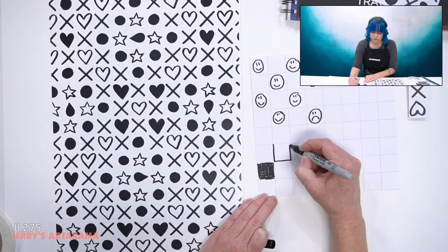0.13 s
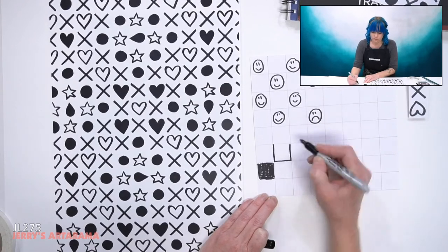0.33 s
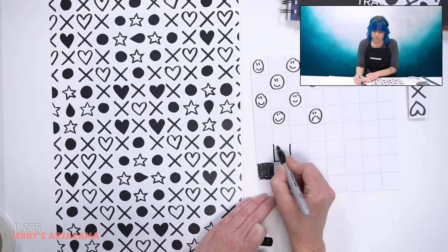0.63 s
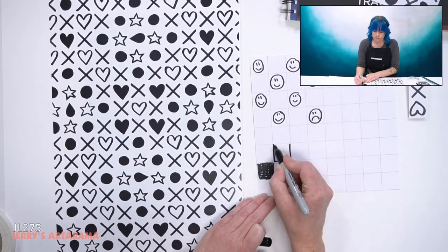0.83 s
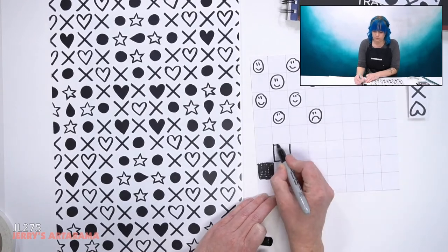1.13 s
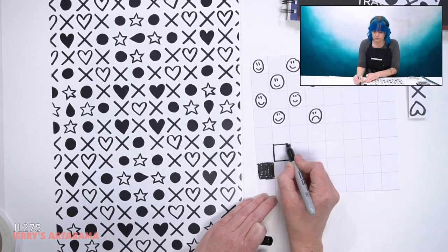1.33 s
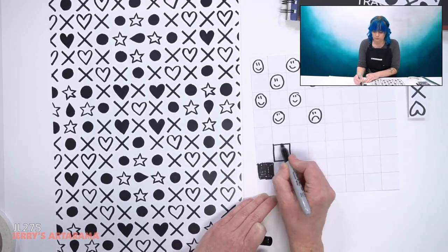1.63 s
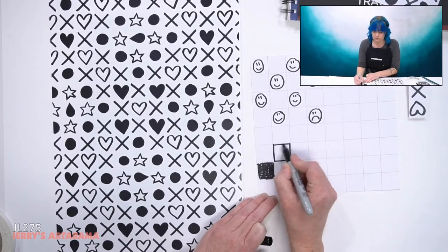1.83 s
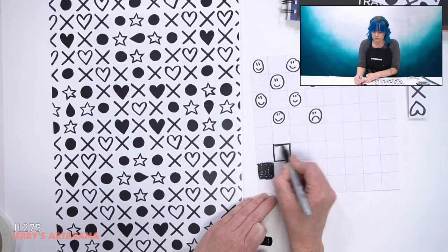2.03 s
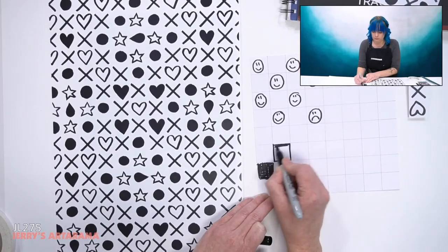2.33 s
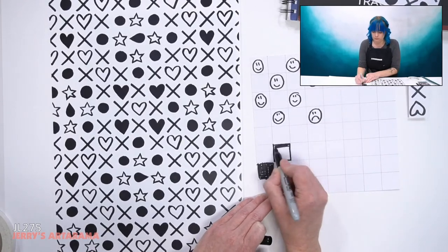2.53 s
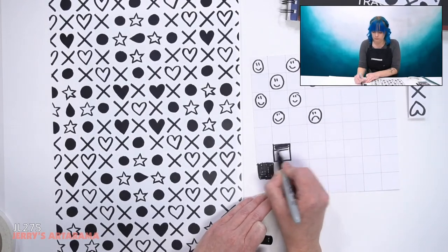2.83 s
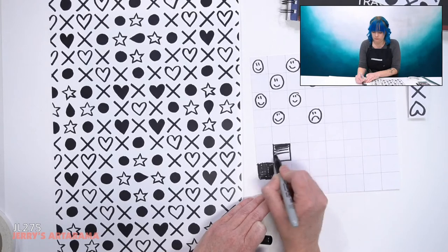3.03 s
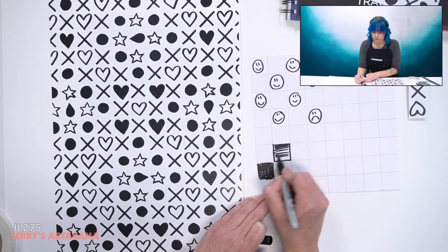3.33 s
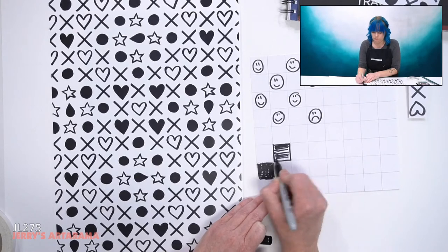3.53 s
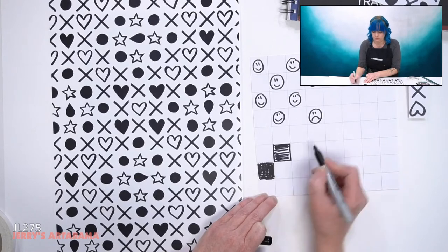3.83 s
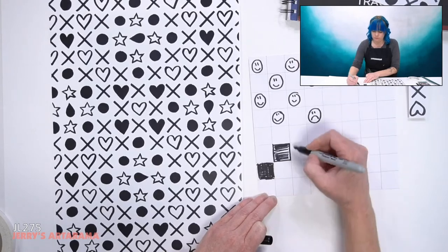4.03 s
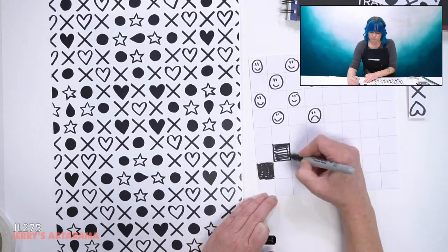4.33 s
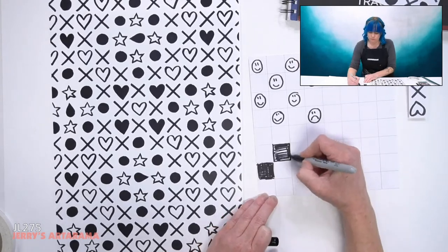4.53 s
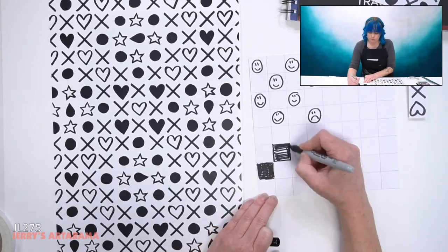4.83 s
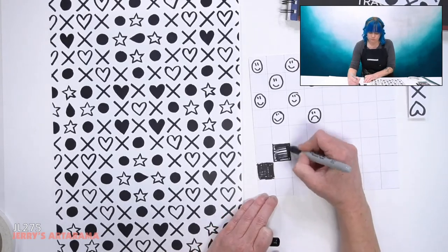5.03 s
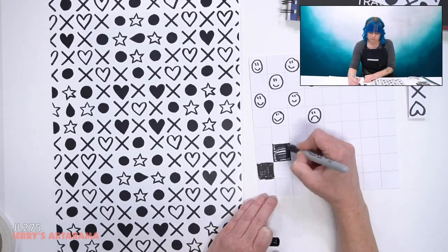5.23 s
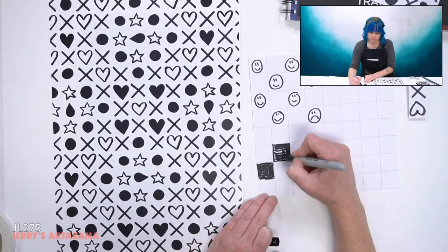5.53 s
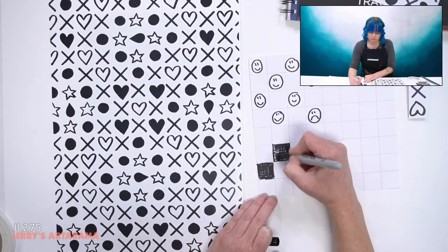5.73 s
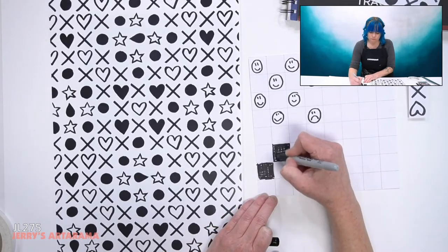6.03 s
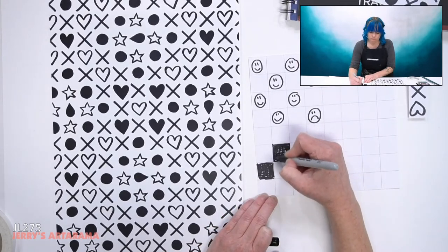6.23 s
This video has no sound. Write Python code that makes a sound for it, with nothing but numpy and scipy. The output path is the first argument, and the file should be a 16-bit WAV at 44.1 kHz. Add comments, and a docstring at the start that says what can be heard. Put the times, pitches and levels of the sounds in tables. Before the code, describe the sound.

A felt-tip marker squeaks out a few slow lines on paper, then scribbles rapid, even hissing strokes in two bouts in a quiet room.

```python
"""A felt-tip marker draws the sides of a small square on paper, then fills it with hissing strokes:
quick up-and-down ones, then, after a change of grip, harder side-to-side ones.
Shaped noise follows the nib's speed and pressure; slow lines stick and slip, and pen and table resonate.
The hand rubs over the sheet, nib and paper touch and bump, and a quiet room hums behind."""
import sys
import numpy as np
from scipy import signal
from scipy.fft import rfft, irfft
from scipy.io import wavfile
from scipy.ndimage import map_coordinates

SR = 44100
rng = np.random.default_rng(int(sys.argv[2]) if len(sys.argv) > 2 else 0)


def put_to_file(sound):
    """Save the sound as 16-bit audio at rate SR, in the file named by the first command-line argument."""
    columns = np.atleast_2d(sound).T  # one column per channel
    safe = np.clip(columns, -1, 1)
    whole_steps = np.round(safe * 32767)
    wavfile.write(sys.argv[1], SR, whole_steps.astype(np.int16))


N = 281269
EDGE_HZ = 15750  # top of the audible band
JUDDER_GAP_S, JUDDER_END_S = 0.0157, 0.14  # first gap between jumps, end of the judder

# Spectrum of felt sticking and slipping. Each row: frequency in Hz, relative density in dB per Hz.
CHATTER_SPECTRUM = [(400, -16), (750, -7.5), (1100, 1), (1330, 3), (1600, -0.5), (2000, -18.5),
                    (2550, -8.5), (3600, -20.5), (8000, -49)]
# Spectrum of the hand rubbing on paper. Each row: frequency in Hz, relative density in dB per Hz.
RUB_SPECTRUM = [(500, -10.5), (1500, -19.5), (2150, -14.5), (2650, -1), (3150, -2), (3650, -3.5),
                (4300, -4.5), (7000, -16), (14000, -43)]


def amp(db):
    """Amplitude factor of a level in dB."""
    return 10 ** (np.asarray(db) / 20)


def unit(x):
    """Scales to rms 1."""
    return x / np.sqrt(np.mean(x ** 2) + 1e-20)


def spectrum(points, hz):
    """Gain at hz, interpolated over log frequency along (Hz, dB) points."""
    point_hz, db = np.transpose(points)
    return amp(np.interp(np.log(hz + 1), np.log(point_hz), db))


def add(mix, start_s, sound):
    """Mixes a sound in from a start time."""
    part = mix[max(round(start_s * SR), 0):][:len(sound)]
    part += sound[:len(part)]


def colour(x, points, echoes=(), path=1):
    """Shapes noise by a spectrum and by close echoes, whose delays scale with path; rms 1."""
    hz = np.fft.rfftfreq(len(x), 1 / SR)
    khz = hz / 1000
    comb = 1 + sum(share * np.exp(-2j * np.pi * khz * ms * path) for ms, share in echoes)
    return unit(irfft(rfft(x) * spectrum(points, hz) * comb, len(x)))


def ring(x, hz, width_hz):
    """A steep resonance, the same peak filter applied twice; rms 1."""
    b, a = signal.iirpeak(hz, hz / width_hz, SR)
    once = signal.lfilter(b, a, x)
    return unit(signal.lfilter(b, a, once))


def fibres(size, grain_db, patch_db, patch_hz=300):
    """Countless tiny snags of uneven strength, bunched by the tooth of the paper; rms 1."""
    snag, strength, tooth = rng.standard_normal((3, size))
    lowpass = signal.butter(2, patch_hz, fs=SR, output="sos")
    tooth = unit(signal.sosfilt(lowpass, tooth))
    snags = unit(snag * amp(grain_db * strength))
    soft_snags = np.tanh(snags / 4.7)  # the soft felt gives way before a snag exceeds 4.7 times the rms
    return unit(soft_snags * amp(patch_db * tooth))


def burst(level_db, decay_s, points):
    """A short scuff of coloured noise that starts quickly and dies away."""
    u = np.arange(0, 4, 1 / (decay_s * SR))  # time in decay lengths
    envelope = (1 - np.exp(-u / 0.12)) / (1 + u ** 6)
    return amp(level_db) * envelope * colour(rng.standard_normal(len(u)), points)


def room_tone(noise_db=-59):
    """Low ventilation noise with a few faint steady tones."""
    # Spectrum of the noise. Each row: frequency in Hz, relative density in dB per Hz.
    noise_spectrum = [(20, -9.5), (32, -14), (44, 1), (62, -3.5), (90, -1.5), (140, 2), (220, -0.5),
                      (400, -3.5), (600, -10), (1100, -15.5), (2000, -19), (5000, -23.5), (10500, -29.5),
                      (15500, -36)]
    # The steady tones. Each row: frequency in Hz, rms level in dB.
    tones = [(44.4, -78), (149.5, -72), (799, -74.5)]
    t = np.arange(N) / SR
    hum = np.zeros(N)
    for hz, db in tones:
        hum += amp(db) * np.sqrt(2) * np.sin(2 * np.pi * (hz * t + rng.random()))
    return amp(noise_db) * colour(rng.standard_normal(N), noise_spectrum) + hum


def scatter(x, delay_s, t60_s):
    """Dense dying reflections: convolution with decaying noise of unit energy."""
    t = np.arange(SR // 2) / SR
    response = rng.standard_normal(len(t)) * (t > delay_s) * amp(-60 * t / t60_s)
    return signal.fftconvolve(x, response / np.linalg.norm(response))[:N]


def stereo_image(mid):
    """A stereo image: nearly mono in the lows and mids, wide in the treble."""
    # Steady part of the side signal. Each row: frequency in Hz, level against the mid in dB.
    steady_width = [(100, -42), (2500, -42), (4000, -28), (4800, -18), (5800, -10), (8000, -5.8),
                    (11000, -3), (15500, -1)]
    # Diffuse part of the side signal. Each row: frequency in Hz, level against the mid in dB.
    diffuse_width = [(100, -30), (1200, -37), (2400, -33), (4000, -21), (5200, -12), (8000, -10.5),
                     (11000, -6.5), (13500, 0), (15500, 1)]
    hz, _, z = signal.stft(mid, SR, nperseg=256)
    # the steady part stands a quarter turn ahead of the mid, so the left leads slightly
    steady = 1j * spectrum(steady_width, hz)[:, None]
    # random phases make part of the treble diffuse between left and right
    phase = np.exp(2j * np.pi * rng.random(z.shape))
    diffuse = np.sqrt(2) * spectrum(diffuse_width, hz)[:, None] * phase
    side = signal.istft(z * (steady + diffuse), SR, nperseg=256)[1][:N]
    return np.array([mid + side, mid - side])


def hand_slides(start_db=-13, end_db=-20):
    """Skin brushes the paper as the hand moves; the noise swells with speed and then settles."""
    # Each row: start, fastest moment and end in seconds, rub level and skin hiss level in dB.
    slides = [(.28, 0.312, 0.45, -54, -54.5), (0.441, 0.449, .5, -54, -53),
              (0.498, 0.515, 0.58, -57.5, -63), (0.603, 0.68, 0.74, -76, -62),
              (0.87, 0.945, 1.02, -76, -82), (3.529, 3.555, 3.61, -52, -64),
              (3.677, 3.705, 3.76, -56, -58.5), (3.74, 3.79, 3.92, -51, -49),
              (3.873, 3.999, 4.08, -60, -60), (4.377, 4.414, 4.46, -54.5, -66),
              (6.33, 6.377, 6.45, -61, -65)]
    # Spectrum of the skin's hiss. Each row: frequency in Hz, relative density in dB per Hz.
    skin_spectrum = [(1000, -5.5), (3000, -3), (4800, -1), (7000, -0.5), (8700, 4), (10200, -1),
                     (12000, -8.5), (15000, -19)]
    out = np.zeros(N)
    for start, fastest, end, rub_db, skin_db in slides:
        t = np.arange(start, end, 1 / SR)
        rise = np.interp(t, [start, fastest], [1, 0])
        fall = np.interp(t, [fastest, end], [0, 1])
        brush = amp(rub_db) * colour(fibres(len(t), 1, 2.4), RUB_SPECTRUM)
        brush += amp(skin_db) * colour(fibres(len(t), 1.6, 1.5), skin_spectrum)
        swell = amp(start_db * rise ** 2 + end_db * fall ** 1.3)
        add(out, start, brush * swell * signal.windows.tukey(len(t), 0.08))
    return out


def contacts():
    """Light taps of nib and fingers, and the sheet bumping on the table, as short noise bursts."""
    # Taps. Each row: start in seconds, level in dB, decay length in seconds.
    touches = [(.207, -61.5, 0.0046), (0.985, -63, 0.0057), (1.03, -73, 0.0045), (4.244, -50.5, 0.0048)]
    # Spectrum of a tap. Each row: frequency in Hz, relative density in dB per Hz.
    touch_spectrum = [(500, 2), (1700, -5), (2300, -3), (3300, 9), (4500, -14), (7000, -9), (10000, -11),
                      (14000, -35)]
    # Bumps of the sheet. Each row: start in seconds, level in dB, decay length in seconds.
    bumps = [(5.156, -57, 0.027), (6.029, -52.5, 0.029), (6.059, -48.5, 0.033), (6.092, -50, .03),
             (6.123, -49, 0.022), (6.146, -58.5, 0.087)]
    # Spectrum of a bump. Each row: frequency in Hz, relative density in dB per Hz.
    sheet_spectrum = [(100, -31.5), (250, -5), (380, 4), (520, -4), (750, -9.5), (1200, -15), (2200, -27),
                      (6000, -41)]
    out = np.zeros(N)
    for start, db, decay_s in touches:
        add(out, start, burst(db, decay_s, touch_spectrum))
    for start, db, decay_s in bumps:
        add(out, start, burst(db, decay_s, sheet_spectrum))
    return out


def judder(count=8, slip_s=0.0072):
    """The nib sticks and jumps along the first line: bursts ever further apart that swell and die away."""
    # Spectrum of one jump. Each row: frequency in Hz, relative density in dB per Hz.
    slip_spectrum = [(500, -10), (900, -4), (1300, 5.5), (1650, -1), (2050, -33), (2450, -3), (3000, -5),
                     (3700, -23), (4500, -9), (5450, -6.5), (6400, -13), (7200, -22), (11000, -23.5),
                     (14000, -37)]
    start_s, gap_growth_s, peak_s = 0.001, 0.00057, 0.068
    peak_db, end_db = -47.5, -53.5
    out = np.zeros(N)
    for k in range(count):
        s = start_s + JUDDER_GAP_S * k + gap_growth_s * k ** 2
        off_peak = (s - peak_s) / (JUDDER_END_S - peak_s)
        add(out, s, burst(peak_db + (end_db - peak_db) * off_peak ** 2, slip_s, slip_spectrum))
    return out


def outlines(stuck_db=-4.0):
    """On slow lines the felt sticks and slips in rough clumps under a thin hiss, as the nib slows."""
    # Slow pulls. Each row: start and end in seconds, chatter level in dB, its fade in dB per second,
    # nib hiss level in dB, factor on the chatter's pitch.
    pulls = [(-.012, 0.206, -51.5, 35, -61.5, 0.99), (1.073, 1.243, -57.5, -14, -53, 1.19),
             (1.215, 1.306, -54, 6, -58, 1.06), (1.29, 1.378, -54.5, 10, -62, 1.06),
             (1.372, 1.455, -56, 23, -68, 0.95), (1.526, 1.727, -52, 74, -50.5, 1.07)]
    # Spectrum of the hiss. Each row: frequency in Hz, relative density in dB per Hz.
    line_hiss = [(400, -13), (2000, 0.5), (3200, 1), (4800, 1.5), (6100, 0), (6700, 5.5), (8200, 1.5),
                 (9800, 1.5), (11500, -4), (15000, -22)]
    # Close echoes of the hiss. Each row: delay in milliseconds, signed share.
    line_echoes = [(.612, 0.036), (.908, .12), (1.228, 0.2), (1.48, -0.038), (1.736, -0.091)]
    attack_s, release_s = 0.025, 0.041
    hiss_fade_db_per_s, pitch_sag_per_s = 43.5, 0.55  # the nib slows along each line
    out = np.zeros(N)
    for start, end, chatter_db, fade_db_per_s, hiss_db, pitch in pulls:
        s = np.arange(max(start, 0), end, 1 / SR)
        t = s - start
        clumps = colour(fibres(2 * len(t), 3.5, 2.2, 210), CHATTER_SPECTRUM)
        # reading the clumps ever more slowly lowers their pitch
        travel = np.cumsum(pitch * np.exp(-pitch_sag_per_s * t))
        chatter = amp(chatter_db - fade_db_per_s * t) * unit(map_coordinates(clumps, [travel]))
        hiss = colour(fibres(len(t), 2.7, 0.95), line_hiss, line_echoes)
        line = chatter + amp(hiss_db - hiss_fade_db_per_s * t) * hiss
        contact = np.minimum(t / attack_s, 1) * np.minimum((end - s) / release_s, 1)
        # the line sounds weaker while the nib judders
        stuck = np.interp(s, [JUDDER_END_S - JUDDER_GAP_S, JUDDER_END_S], [stuck_db, 0])
        add(out, s[0], line * contact * amp(stuck))
    return out


def nib_speed(t, length, start_db, attack_s, brake_share, stop_share, rest_db, brake_power):
    """Speed in dB through one stroke: attack, hold, brake, rest."""
    rising = np.interp(t, [0, attack_s], [1, 0])
    braking = np.interp(t / length, [brake_share, stop_share], [0, 1])
    return start_db * rising ** 2 + rest_db * braking ** brake_power


def scribble(turns, effort, gesture, hiss, echoes, return_db, rub_db, rub_return_db,
             pen_hz, pen_width_hz, pen_db, table_db, body_return_db,
             chatter_db, grab_db, grain_db, patch_db, waver_db, path_drift):
    """Each stroke hisses with the nib's speed, rings the pen, shakes the table and drags the hand along."""
    # Spectrum of the table top under the nib. Each row: frequency in Hz, relative density in dB per Hz.
    table_spectrum = [(80, -8), (170, -6.5), (280, 1.5), (430, -4.5), (600, -16), (850, -7), (1100, -5),
                      (1400, -12.5), (2200, -9.5), (5000, -52)]
    brighten = 1.2  # dB more at the very top of the hiss for each dB of effort
    stick_speed_db, stick_spread_db = -6.5, 4  # the felt grabs while passing through this low speed
    mean_effort_db = np.mean(effort, axis=0)[1]
    out = np.zeros(N)
    for k, place in enumerate(np.linspace(-1, 1, len(turns) - 1)):
        start, end = turns[k], turns[k + 1]
        t = np.arange(start, end, 1 / SR)
        size = len(t)
        way = 1 if k % 2 else -1  # outward and return strokes weigh differently on nib, pen and hand
        effort_db = np.interp(start, *np.transpose(effort))
        push_db = effort_db - mean_effort_db
        pressure_db = waver_db * np.interp(t, np.linspace(start, end, 8), rng.standard_normal(size=8))
        speed_db = nib_speed(t - start, end - start, **gesture) + pressure_db

        # the hand creeps across the square, scaling the echo delays
        path = 1 + path_drift * place + 0.026 * rng.standard_normal()
        # the fingers shift too, adding echoes (ms, share) that colour each stroke differently
        fingers = list(zip(rng.uniform(0.2, 2.4, size=4), rng.choice([-0.11, 0.11], size=4)))
        bright = [(hz, db + brighten * push_db * (hz / EDGE_HZ) ** 2) for hz, db in hiss]
        felt = colour(fibres(size, grain_db, patch_db), bright, list(echoes) + fingers, path)
        nib = amp(effort_db + way * return_db + speed_db) * felt

        # the first strokes cross bare paper and chatter
        bare = np.exp(-((start - turns[0]) / 0.68) ** 2)
        # on wet ink the pen rings instead, and the felt grabs only near the turns
        grab = np.exp(-((speed_db - stick_speed_db) / stick_spread_db) ** 2)
        chatter_gain = np.hypot(bare * amp(chatter_db + 0.5 * speed_db), amp(grab_db) * grab)
        chatter = chatter_gain * colour(fibres(size, 2.5, 2.4), CHATTER_SPECTRUM)
        barrel_hz = pen_hz * (1 + 0.02 * rng.standard_normal())
        barrel = ring(rng.standard_normal(size), barrel_hz, pen_width_hz)
        pen = (1 - 0.5 * bare) * amp(pen_db + 0.36 * speed_db + 6.2 * grab) * barrel
        table = amp(table_db + 0.31 * speed_db) * colour(fibres(size, 2, 4.3, 57), table_spectrum)
        weight = amp(way * body_return_db + 0.5 * push_db)

        # the edge of the hand scrapes hardest in mid-stroke
        scrape = colour(fibres(size, 4.0, 1), RUB_SPECTRUM)
        scrape += 0.75 * ring(fibres(size, 1.1, 2.7), 3260 + rng.uniform(-130, 160), 530)
        mid_stroke = np.sin(np.pi * (t - start) / (end - start))
        rub = amp(rub_db + way * rub_return_db + 0.39 * speed_db) * mid_stroke * unit(scrape)
        add(out, start, nib + weight * (chatter + pen + table) + rub)
    return out


def upright_fill():
    """Quick up-and-down strokes, each lasting until the nib's next turn."""
    # Moments in seconds when the nib turns round.
    turns = [1.758, 1.876, 1.986, 2.078, 2.177, 2.264, 2.354, 2.442, 2.531, 2.611, 2.696, 2.776, 2.861,
             2.947, 3.027, 3.109, 3.193, 3.277, 3.357, 3.437, 3.522, 3.601, 3.684]
    # How hard the hand bears down. Each row: time in seconds, base level of the nib's hiss in dB.
    effort = [(1.76, -52), (2.0, -48), (2.25, -48), (2.55, -46.5), (3.05, -47.5), (3.3, -47.5),
              (3.6, -49.7)]
    # Nib speed through a stroke: start and rest in dB, attack in seconds, brake and stop as shares of it.
    gesture = dict(start_db=-10.5, attack_s=0.025, brake_share=0.44, stop_share=0.98, rest_db=-24.5, brake_power=2.94)
    # Hiss of felt on paper. Each row: frequency in Hz, relative density in dB per Hz.
    hiss = [(150, -8.5), (500, -31), (1300, -10), (2100, -12.5), (2900, -6), (5000, -2.5), (6600, 0.5),
            (8000, 0.5), (10200, 0.5), (11800, -6), (13500, -16.5), (15500, -34)]
    # Echoes off hand, pen and table. Each row: delay in milliseconds, signed share.
    echoes = [(.492, 0.11), (.59, 0.025), (.824, 0.063), (.89, 0.17), (1.175, .13), (1.3, 0.2),
              (1.448, 0.071)]
    return scribble(turns, effort, gesture, hiss, echoes,
                    return_db=0.73, rub_db=-60, rub_return_db=-2.0,
                    pen_hz=1733, pen_width_hz=340, pen_db=-65.0, table_db=-68.5, body_return_db=0.94,
                    chatter_db=-62.5, grab_db=-67, grain_db=3.0, patch_db=0.6,
                    waver_db=0.86, path_drift=-0.031)


def sideways_fill():
    """Harder side-to-side strokes in the other grip, each lasting until the nib's next turn."""
    # Moments in seconds when the nib turns round.
    turns = [4.282, 4.375, 4.472, 4.565, 4.658, 4.754, 4.853, 4.945, 5.04, 5.132, 5.233, 5.327, 5.416, 5.51,
             5.612, 5.704, 5.804, 5.894, 5.986, 6.083, 6.171, 6.255, 6.334]
    # How hard the hand bears down. Each row: time in seconds, base level of the nib's hiss in dB.
    effort = [(4.28, -49), (4.45, -46.5), (4.75, -47), (5.25, -45), (5.55, -45.5), (5.7, -43), (5.82, -46),
              (6.08, -45.5), (6.17, -43.6), (6.255, -51)]
    # Nib speed through a stroke: start and rest in dB, attack in seconds, brake and stop as shares of it.
    gesture = dict(start_db=-16, attack_s=0.0063, brake_share=0.52, stop_share=.81, rest_db=-25, brake_power=1.87)
    # Hiss of felt on paper. Each row: frequency in Hz, relative density in dB per Hz.
    hiss = [(150, -27), (400, -15), (800, -30.5), (1400, -12.5), (2100, -13), (2800, -9.5), (4500, -8),
            (6000, -3.5), (8400, 1), (10400, -5.5), (11600, -8.5), (13200, -13.5), (15300, -27.5)]
    # Echoes off hand, pen and table. Each row: delay in milliseconds, signed share.
    echoes = [(.348, 0.1), (.488, -0.092), (.72, 0.15), (.784, 0.097), (.856, -.09), (1.772, 0.061),
              (2.168, 0.063)]
    return scribble(turns, effort, gesture, hiss, echoes,
                    return_db=-0.12, rub_db=-58.0, rub_return_db=4.5,
                    pen_hz=1522, pen_width_hz=200, pen_db=-65.5, table_db=-62.5, body_return_db=1.4,
                    chatter_db=-81, grab_db=-60, grain_db=3.0, patch_db=0.5,
                    waver_db=1.2, path_drift=-0.0055)


def scene():
    """Pen, paper and hand on a table top in a small, fairly dead room."""
    desk = hand_slides() + contacts() + judder() + outlines()
    desk += upright_fill() + sideways_fill()
    table_top = amp(-9.5) * scatter(desk, delay_s=0.0018, t60_s=0.023)
    room = amp(-13.5) * scatter(desk, delay_s=0.0073, t60_s=0.36)
    return stereo_image(desk + table_top + room + room_tone())


def record(dry):
    """The recorder's band limit: a steep low-pass."""
    lowpass = signal.firwin(511, EDGE_HZ, window=("kaiser", 9), fs=SR)
    return signal.oaconvolve(dry, lowpass[None], "same")


dry = scene()
out = record(dry)
put_to_file(out)
```